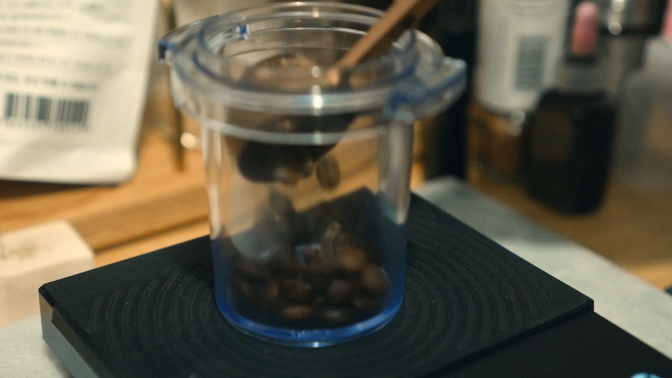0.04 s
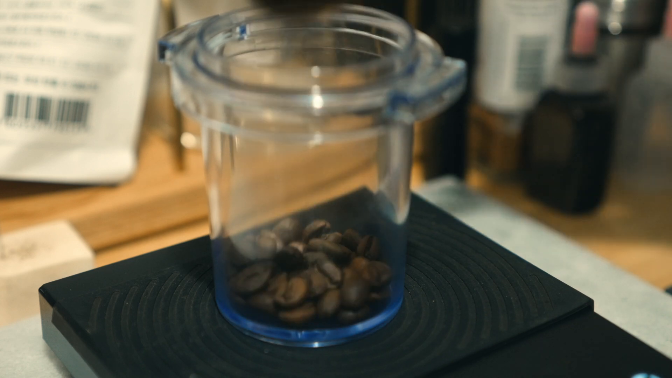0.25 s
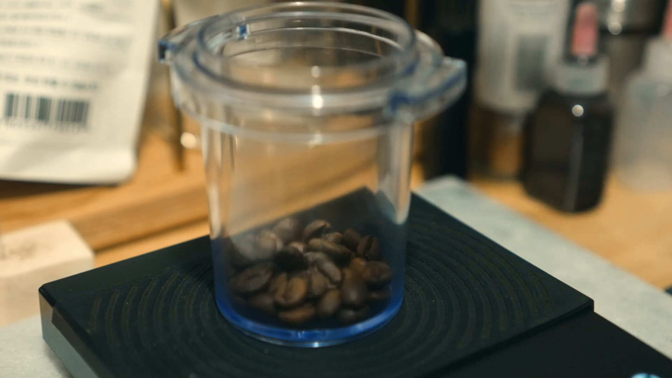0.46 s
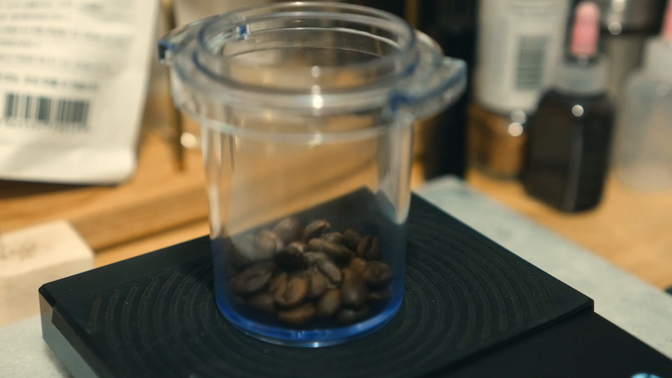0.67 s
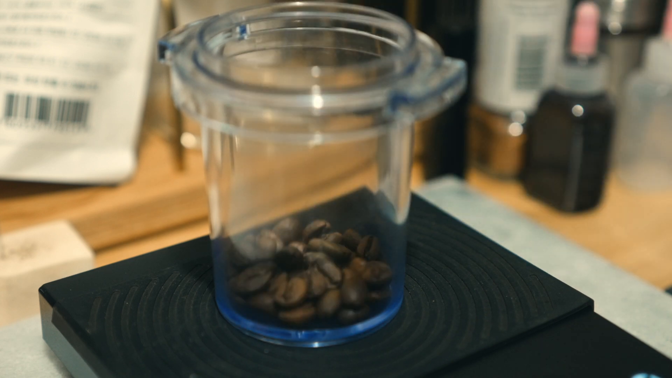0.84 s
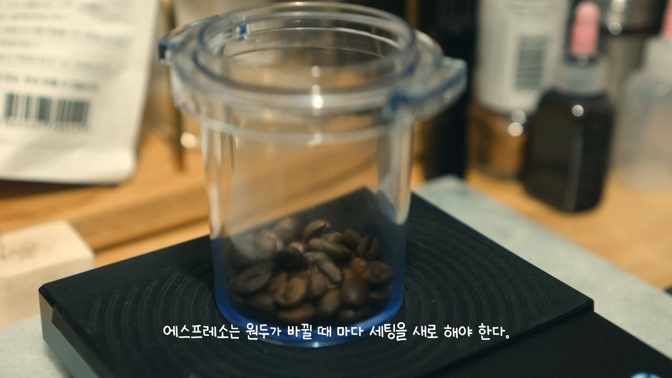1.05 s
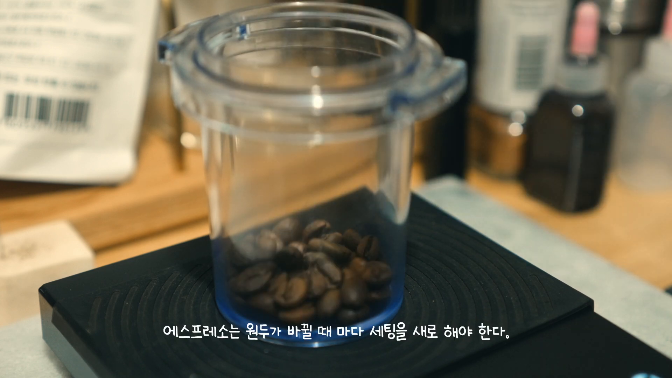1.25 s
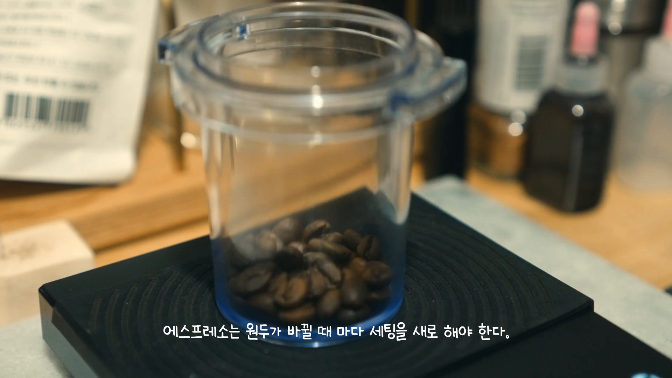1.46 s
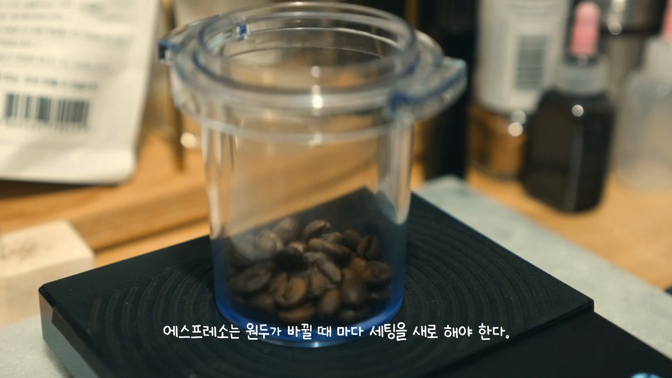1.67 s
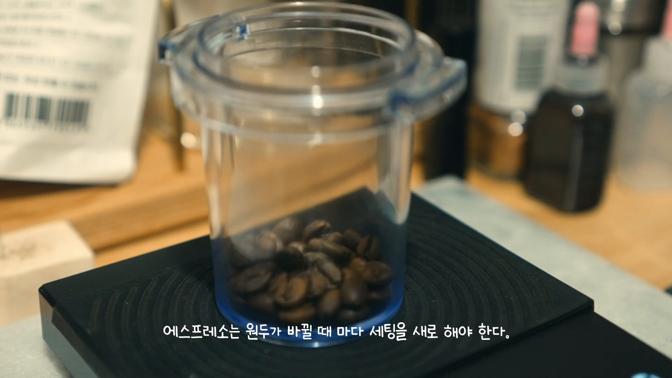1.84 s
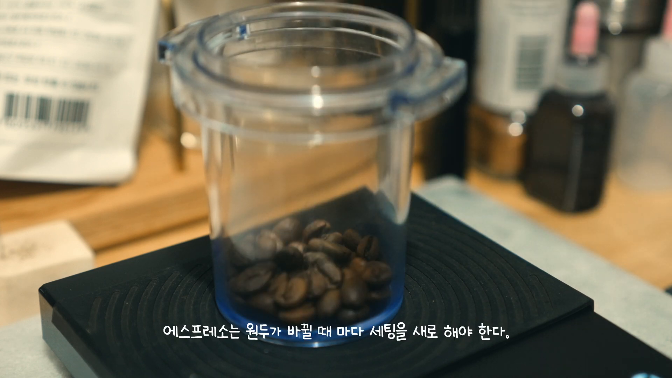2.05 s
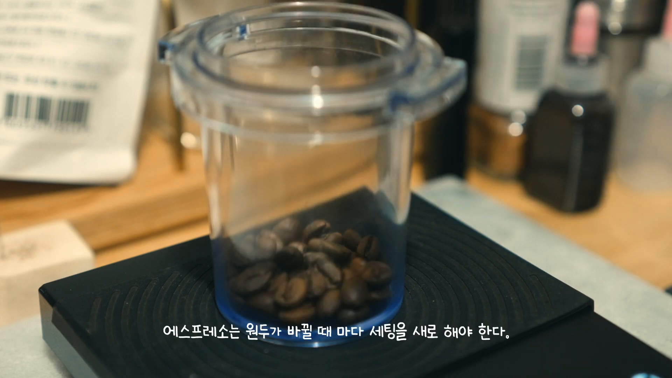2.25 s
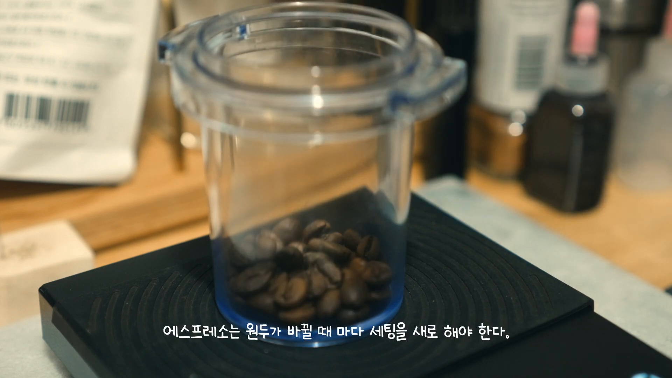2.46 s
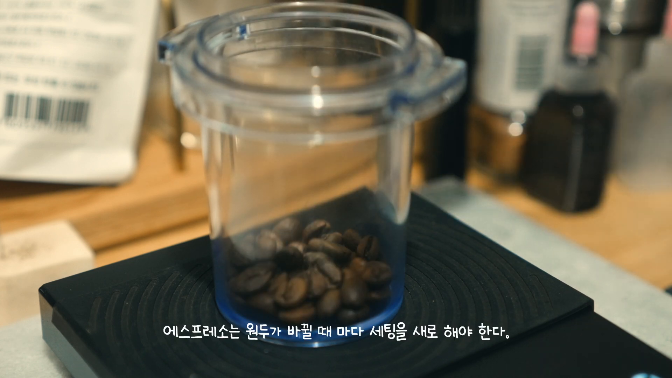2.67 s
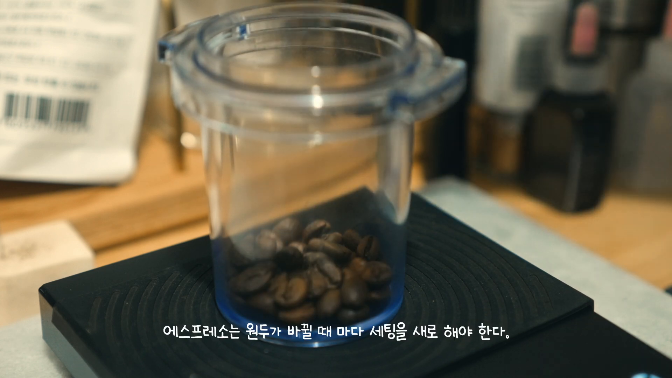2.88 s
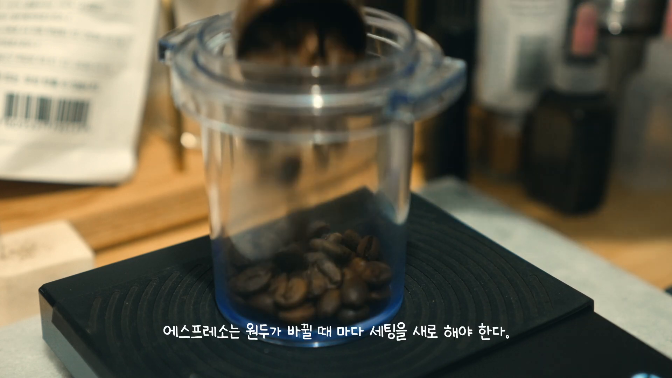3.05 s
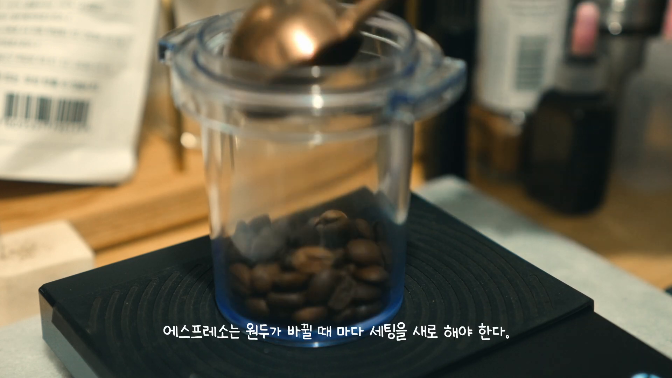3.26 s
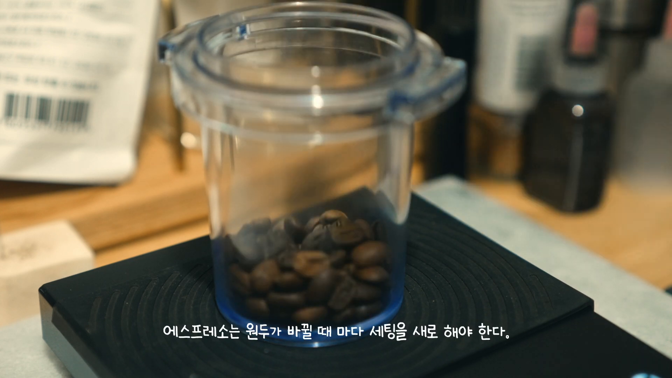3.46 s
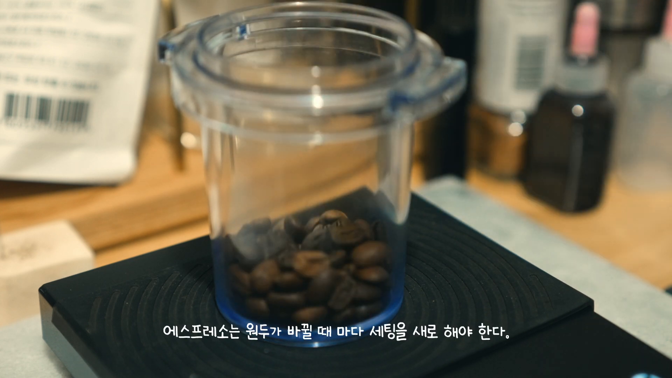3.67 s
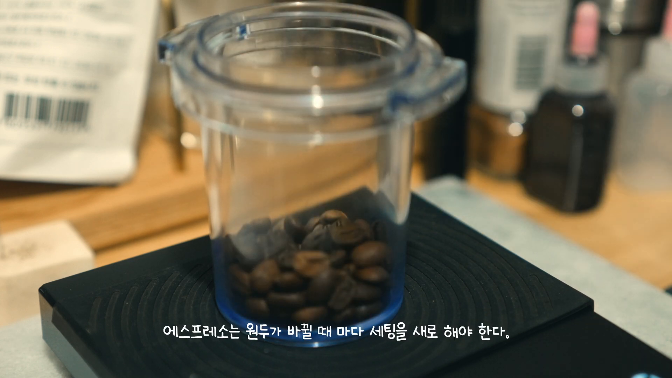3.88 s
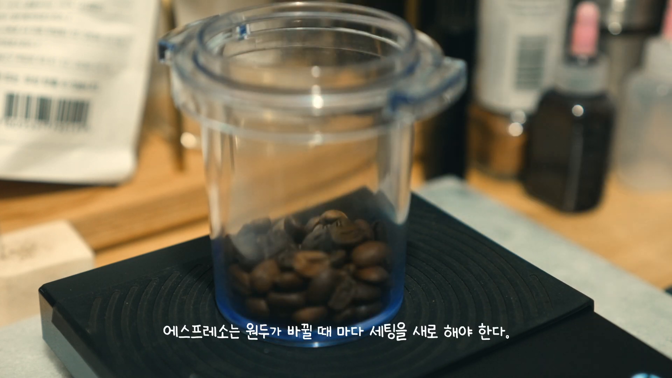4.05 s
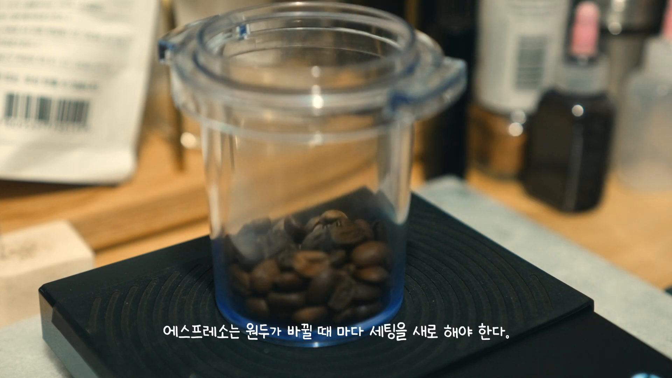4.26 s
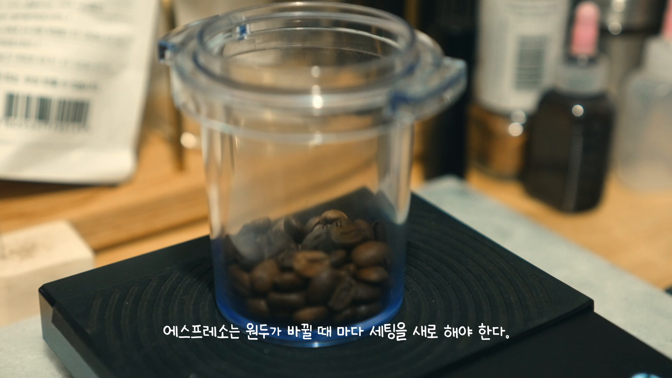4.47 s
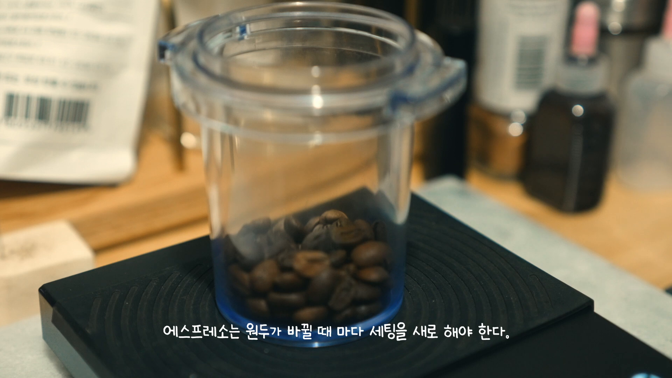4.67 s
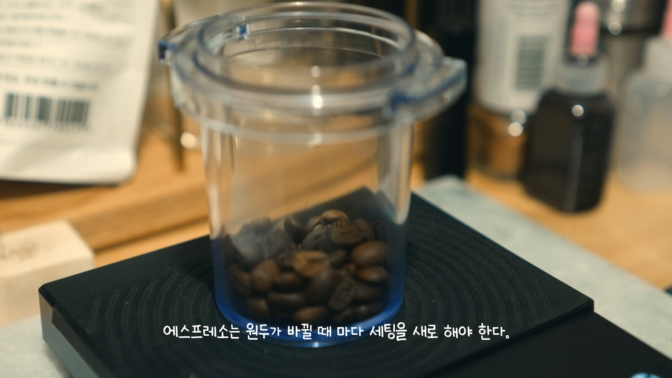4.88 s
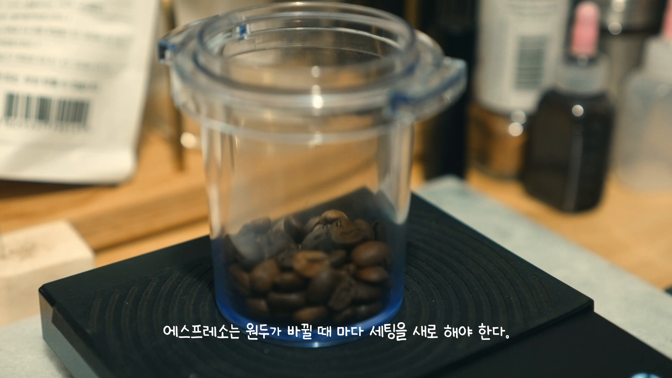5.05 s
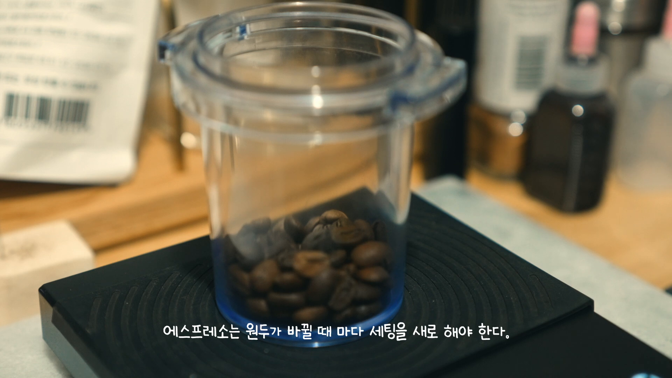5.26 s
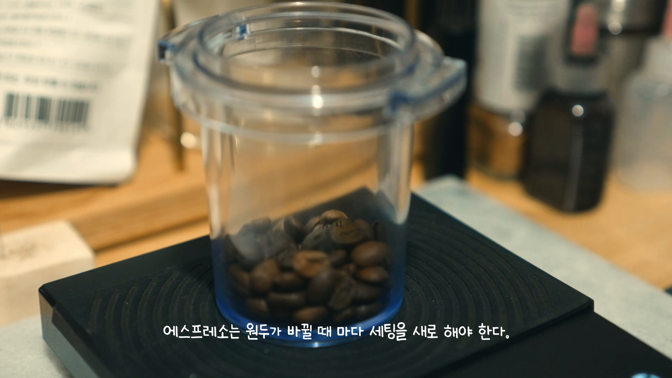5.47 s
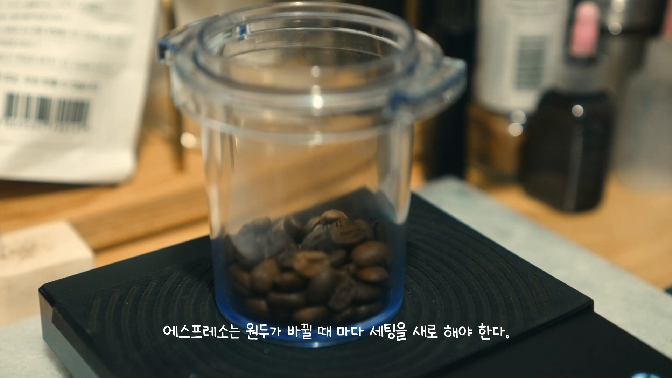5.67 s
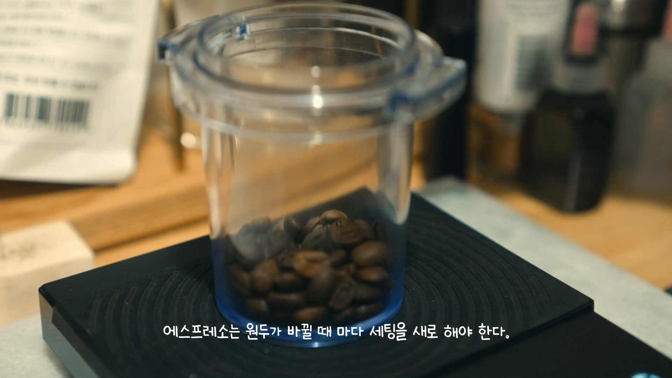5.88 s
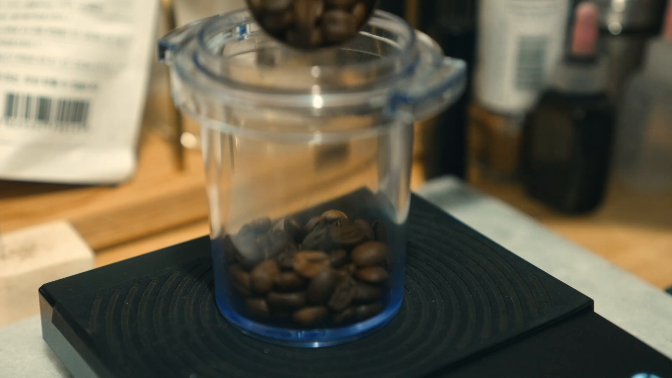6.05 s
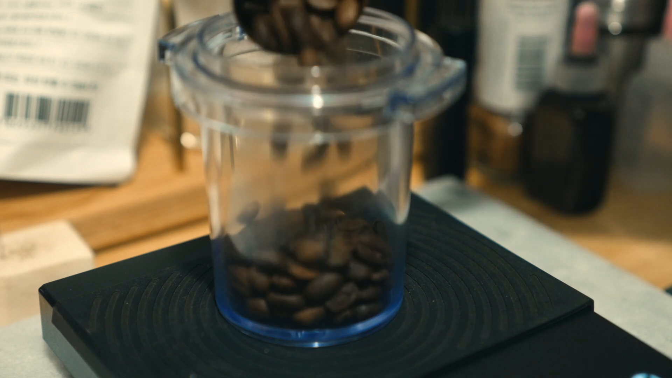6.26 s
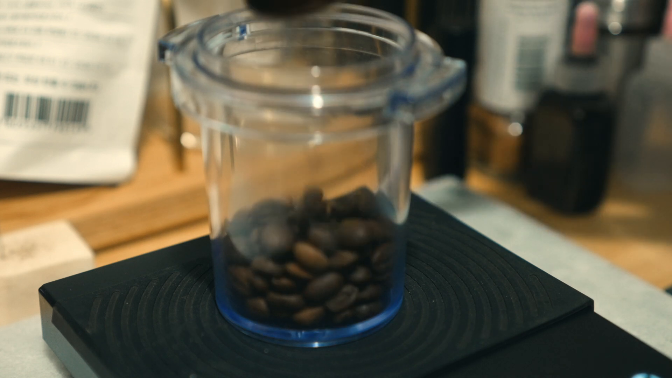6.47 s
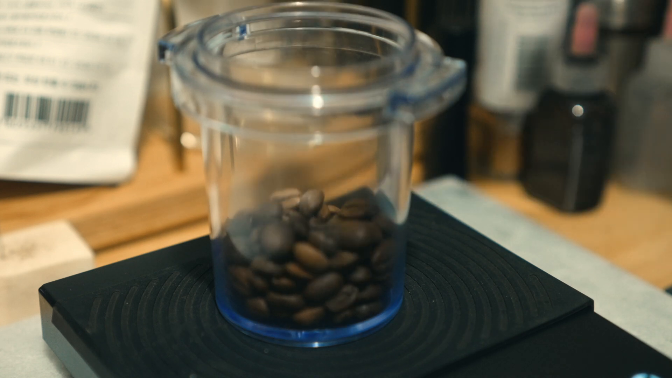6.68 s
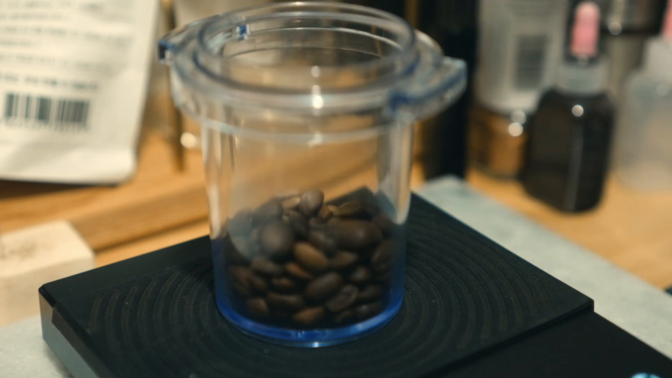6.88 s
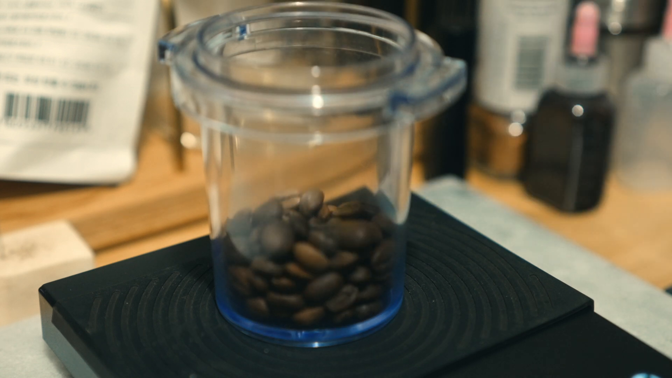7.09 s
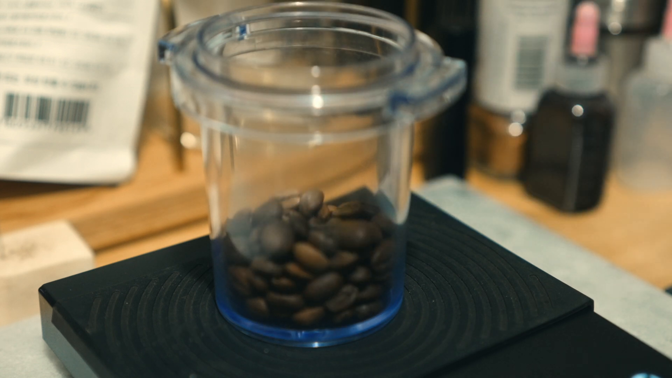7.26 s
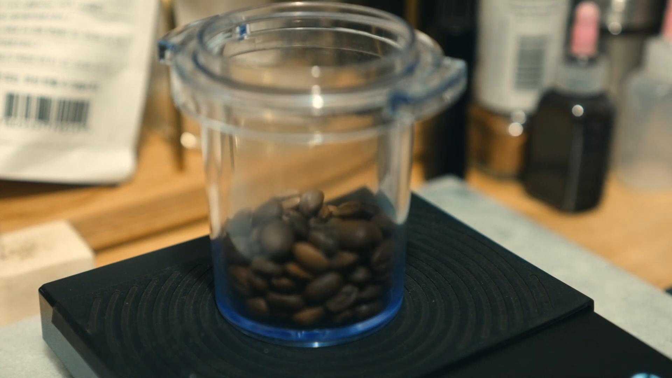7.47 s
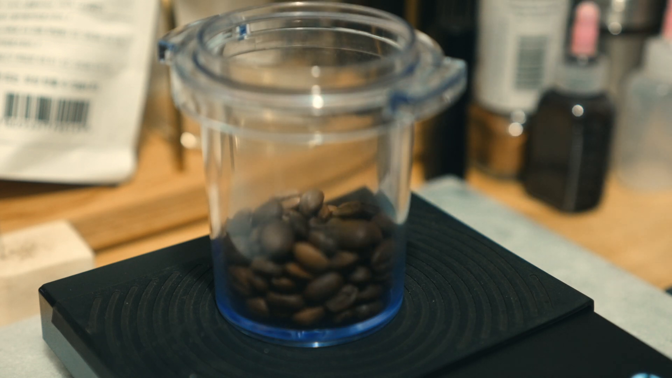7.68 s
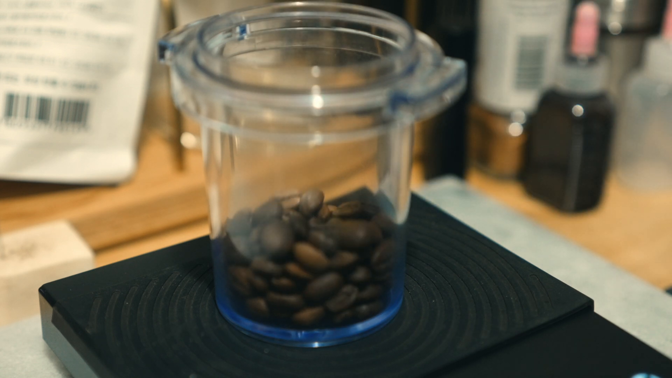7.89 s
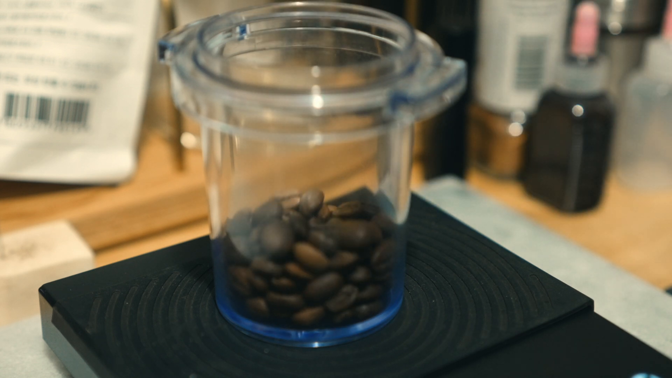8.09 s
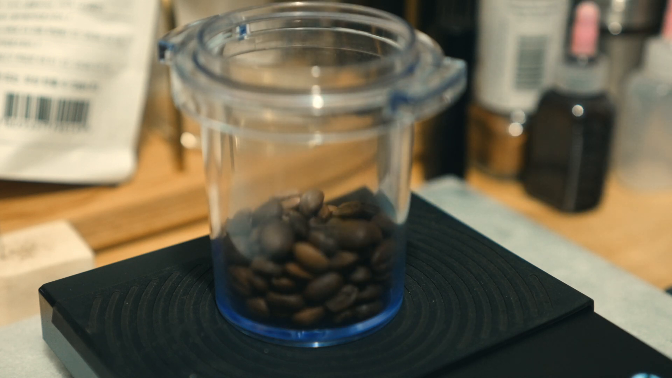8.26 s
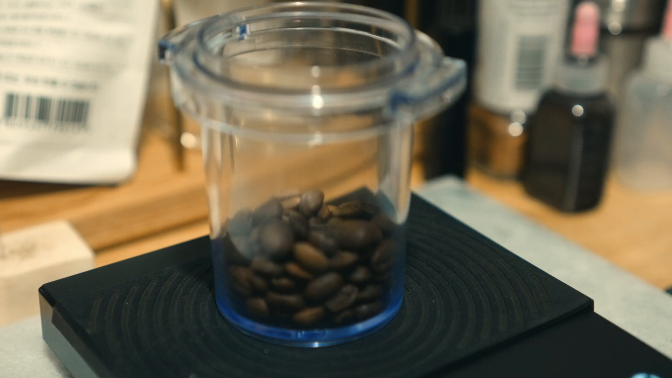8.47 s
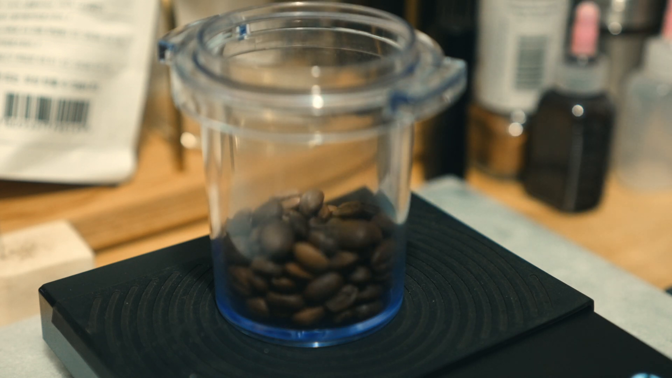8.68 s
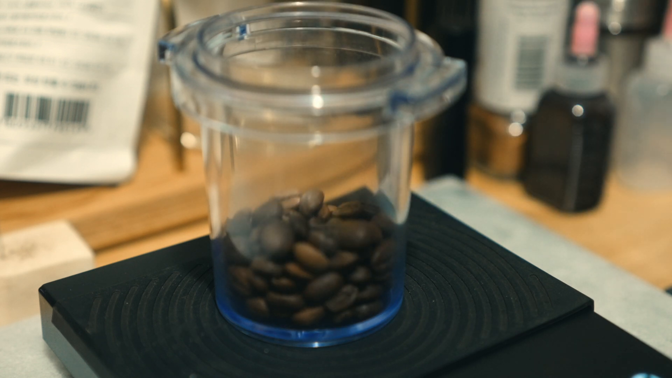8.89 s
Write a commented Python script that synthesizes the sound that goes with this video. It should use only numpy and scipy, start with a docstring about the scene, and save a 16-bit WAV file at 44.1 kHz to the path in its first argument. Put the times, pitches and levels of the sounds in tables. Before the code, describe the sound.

Three short pours of coffee beans hit a plastic cup, each a loud, crisp burst of hard clicks stopping quickly. Between them come softer, hollower jar scoops, a sharp spoon tap and tiny metallic ticks of beans settling in the spoon. A hard counter knock follows the last pour. Close microphone, small dry room with short echoes and low steady noise.

```python
"""In a quiet kitchen, close to one microphone, roasted beans are scooped from a jar with a metal spoon
and poured three times into a hard plastic cup. Each bean is a click that rings whatever it strikes.
Spoon and jar also knock on the wooden counter. Faint echoes and a steady hush lie around it all,
and the loudest clatter is limited."""
import sys
import numpy as np
from scipy import signal
from scipy.fft import rfft, irfft
from scipy.io import wavfile
from scipy.ndimage import uniform_filter1d, minimum_filter1d

SR = 44100
rng = np.random.default_rng(int(sys.argv[2]) if len(sys.argv) > 2 else 0)


def waveform_to_disk(signal):
    """Save audio, clipped to [-1, 1], as 16-bit WAV at the path in sys.argv[1]."""
    frames = np.transpose(np.atleast_2d(signal))
    scaled = np.clip(frames, -1, 1) * 32767
    samples = np.round(scaled).astype(np.int16)
    wavfile.write(sys.argv[1], SR, samples)


def invert_db(level):
    """Linear amplitude ratio for a level in decibels (20 dB per decade), elementwise."""
    return 10 ** (np.asarray(level, dtype=float) / 20)


N = 393813  # length in samples

# Handfuls of small clicks in the cup, the jar, the tilted spoon and on the counter.
# Each row: start in seconds, swell in seconds (1 ms at least), hold in seconds,
# bright rattle at the top of the swell in dB, hollow body in dB above the rattle.
POURS = [(0.0, .001, 0.13, -8.5, -30.5), (2.94, .005, .085, -41.5, 5.5), (3.058, .002, .13, -11, -27),
         (6.072, .02, .022, -19.5, -18), (6.146, .002, .345, -14.5, -20)]
SCOOPS = [(0.9, .002, .2, -25.5, -12), (1.09, 0.029, .065, -20, -3), (1.235, 0.0081, .15, -23, -4.5),
          (1.37, 0.05, .06, -14.5, -18.5), (1.53, 0.033, .25, -22.5, -16), (1.85, .003, .11, -25, -16),
          (2.04, 0.0043, 0.034, -51.5, 5.5), (4.141, .002, .11, -27, -4), (4.23, .045, .05, -21, -4),
          (4.35, .13, .13, -21, -15), (4.62, 0.023, .09, -20, -16.5), (4.77, .03, .008, -23, -15),
          (4.899, .001, 0.0037, -20.5, -15.5), (7.843, 0.0018, .1, -29, -10.5),
          (7.93, 0.015, .012, -22.5, -10), (7.975, 0.012, 0.041, -14.5, -21),
          (8.06, .015, .075, -25.5, -21), (8.17, 0.017, .05, -27.5, -32), (8.235, .03, 0.014, -20.5, -24),
          (8.355, 0.0033, 0.005, -36, -9.5), (8.487, 0.0032, .02, -48.5, -3),
          (8.735, 0.0092, .05, -43.5, -21)]
TILTS = [(2.94, .01, 0.11, -33.5, -20.5), (5.96, 0.024, .085, -42, -15.5)]
SKIDS = [(7.13, 0.0009, .006, -13.5, -6.5), (7.235, .03, 0.024, -25, -3), (7.345, 0.0055, 0.013, -48, -16)]

# The loudest single blows, and loose beans rolling in the lifted spoon.
# Each row: time in seconds, peak of the bright part in dB before limiting.
CUP_HITS = [(0.0404, -0.5), (0.0588, -1.5), (0.1261, -1), (0.1472, -2), (0.1624, -5), (0.1814, -12),
            (0.1989, -12), (0.2157, -16), (0.2389, -18), (3.0599, -1), (3.0774, 2.5), (3.0994, -0.5),
            (3.1185, -1), (3.1424, 1.5), (3.1652, -0.5), (3.1777, -0.5), (3.2236, -1), (3.2804, -10),
            (3.3025, -17.5), (3.3717, -36), (6.0714, -1), (6.0886, 0.5), (6.0995, 2.5), (6.1474, 3.5),
            (6.1689, 0.5), (6.1823, 1.5), (6.2102, -2.5), (6.2278, 4.5), (6.2544, 3.5), (6.2831, 0),
            (6.3026, 1), (6.332, 4), (6.3889, 1.5), (6.4278, 2.5), (6.4405, 0.5), (6.4686, 1.5),
            (6.4916, 2), (6.5571, -6.5)]
JAR_HITS = [(0.9218, -11.5), (0.9974, -14), (1.1138, -4), (1.2436, -6.5), (1.4057, -1.5), (1.4636, 2),
            (1.5594, -10), (1.5858, -11.5), (1.6134, -8.5), (1.6472, -10.5), (1.6734, -9.5), (1.713, -7),
            (1.7548, -8), (1.7699, -2), (1.7797, -3), (1.8079, -5.5), (1.8522, -9.5), (1.8787, -3.5),
            (1.8991, -7.5), (1.9365, -9), (1.9614, -7.5), (2.0068, -21.5), (2.0517, -27.5), (2.0792, -34),
            (4.2765, -6.5), (4.2974, -7), (4.3154, -4), (4.4199, -13.5), (4.4807, -9), (4.5047, -7),
            (4.5321, -6.5), (4.6006, -8.5), (4.6349, -8.5), (4.7069, -6), (4.8015, -3), (4.8394, -15.5),
            (5.043, -35), (7.8433, -16), (7.9473, -5), (8.0726, -10.5), (8.091, -6.5), (8.104, -10),
            (8.1249, -10), (8.1698, -18), (8.1885, -14.5), (8.242, -7.5), (8.265, -6), (8.3355, -17),
            (8.3608, -16), (8.4348, -35.5), (8.4884, -32), (8.4996, -30.5)]
SPOON_TICKS = [(2.474, -33), (2.5623, -40), (2.8326, -39.5), (2.8745, -35), (2.8853, -33), (3.0082, -14),
               (3.038, -13.5), (5.1095, -26), (5.2349, -21.5), (5.2979, -31), (5.3267, -27), (5.3805, -34),
               (5.9694, -22), (5.9811, -23.5), (5.9957, -19.5), (6.0146, -15), (6.0444, -17.5),
               (6.0587, -16), (8.6139, -33.5), (8.7081, -42.5), (8.7429, -28.5), (8.7676, -29.5),
               (8.7901, -26)]

# The spoon taps the cup's rim (one row only), the spoon taps the jar, and knocks on the counter.
# Each row: time in seconds, peak of the bright part in dB before limiting,
# hollow body in dB above the rattle.
RIM_TAP = (2.9282, 0, 4)
JAR_TAPS = [(0.9015, -8, -6), (4.1425, -23.5, -3.5), (4.8993, 1, -16), (8.3731, -17, -1.5)]
COUNTER_KNOCKS = [(4.901, -19, 0), (7.1307, 3, -7), (7.262, -25, 13.5), (7.2731, -14.5, 0.5),
                  (7.2925, -23, 12), (7.3547, -17.5, -11.5)]

# The tones each thing rings with; cup() changes some of the cup's as it fills.
# Each row: pitch in Hz, width in Hz, relative strength in dB.
CUP_MODES = [(996, 70, -14), (1822, 60, -17), (3168, 55, -13), (3688, 45, -3), (4258, 45, -7),
             (5015, 70, -6), (5340, 70, -6), (5880, 50, -4), (6710, 65, 0), (7090, 70, -1), (7370, 90, -2),
             (7615, 110, -2), (8230, 90, -8), (8720, 110, -9), (9800, 60, -15), (11000, 250, -18)]
JAR_MODES = [(199, 16, -19.5), (551, 51, -11.5), (835, 64, -11.5), (1291, 87, -13), (1616, 60, -9.5),
             (2380, 82, -10.5), (3030, 17, -7), (3840, 30, -4.5), (4750, 84, -5.5), (4890, 44, -4),
             (6880, 690, -4.5), (7430, 250, 0), (8100, 65, -1.5), (9190, 110, -10), (11200, 47, -21)]
SPOON_MODES = [(4130, 89, -12), (5370, 55, -3), (6720, 65, -12), (6990, 50, -9), (7450, 42, 0),
               (9330, 45, -9), (12000, 120, -19)]
COUNTER_MODES = [(217, 94, -3.5), (390, 210, 2), (603, 57, 2), (3090, 87, -6), (3860, 450, -4.5),
                 (4900, 120, -6), (7060, 110, 0), (7700, 360, -8)]

# Colour of the dry crack heard between those tones.
# Each row: frequency in Hz, relative strength in dB per Hz.
CUP_CRACK = [(300, -53), (650, -26), (950, -17.5), (1400, -34.5), (2500, -16.5), (3300, -6.5), (5000, -6),
             (7300, 1), (9300, -11.5), (13000, -8.5), (16000, -18)]
JAR_CRACK = [(100, -32), (210, -19), (340, -40), (535, -5), (1950, -9.5), (2370, -4), (3320, -2.5),
             (7290, 3), (8830, -3), (13000, -1.5), (15600, -6.5), (16300, -21.5)]
SPOON_CRACK = [(880, -36), (2000, -17.5), (4600, -5), (7500, -1), (10300, -17), (14100, -17),
               (16000, -21.5)]
COUNTER_CRACK = [(35, -52), (60, -34), (103, -21), (207, -8), (469, -12.5), (700, -6), (1110, -28.5),
                 (3120, -20), (5330, -12.5), (6900, -1.5), (16000, -26)]

# How the cup's ring changes as it fills and landing beans damp its floor and reach its wall.
# Each row: time in seconds, pitch factor of its air, change of wall ring in dB, of floor ring in dB.
CUP_FILL = [(.2, .88, -4, 9), (2.93, .93, 3, 6), (3.1, .89, -2, -5), (6.3, 1.01, 1, -6)]

# Colour of the steady noise. Each row: frequency in Hz, relative strength in dB per Hz.
HUSH_COLOUR = [(12, -63), (20, -28.5), (32, -24), (49, -6.5), (108, -1.5), (437, -15.5), (547, -12.5),
               (724, -17), (810, -9.5), (1040, -16.5), (1590, -7), (3200, -12.5), (6100, -12.5),
               (15000, -20), (16300, -25)]

# How long the kitchen echoes. Each row: frequency in Hz, time to fall 60 dB in seconds.
KITCHEN_DECAY = [(250, .25), (1000, 0.31), (3000, 0.16), (8000, 0.16), (11000, 0.22), (15000, 0.16)]

# How the small clicks come: clumps a second, spread of their sizes in dB, steady slide under them.
POURING, SCOOPING = (360, 1.8, .85), (260, 2.1, .9)
TILTING, SKIDDING = (150, 1.5, .9), (300, 1., 1.5)

# How a handful dies, all in dB a second: sag while it holds, later fall of the rattle, fall of the body.
POUR_END, SCOOP_END = (21, 260, 260), (17, 300, 140)
TILT_END, SKID_END = (5, 600, 600), (40, 300, 256)

SPLIT_HZ = 2200  # bright sound lies above this, hollow sound below
SILENT_DB = -75  # the rattle ends here
SWELL_DB = 12  # the rattle starts this far below its top


def evened(x):
    """Scales a sound to an average strength (rms) of 1."""
    return x / np.sqrt(np.mean(x ** 2) + 1e-30)


def read(points, at):
    """Reads values between (Hz, value) points, with frequency on a log scale."""
    hz, value = np.transpose(points)
    return np.interp(np.log(at + 1), np.log(hz + 1), value)


def hush():
    """Steady room and microphone noise: coloured random noise whose level drifts a little."""
    hz = np.fft.rfftfreq(N, 1 / SR)
    spectrum = rfft(rng.standard_normal(N)) * invert_db(read(HUSH_COLOUR, hz))
    noise = evened(irfft(spectrum, N))
    drift = evened(uniform_filter1d(rng.standard_normal(N), 12000))
    return invert_db(-58 + 1.2 * drift) * noise  # both in dB


def contacts(length):
    """Tiny chance clicks, about 13 in each millisecond."""
    return rng.standard_normal(length) * (rng.random(length) < .3)


def clump(length, rise_s, chatter_s):
    """How hard things jostle after a landing: a quick rise, then a dying chatter."""
    t = np.arange(length) / SR
    return (1 - np.exp(-t / rise_s)) * np.exp(-t / chatter_s)


def causal(points):
    """A short click of the given colour whose energy comes as early as it can (minimum phase)."""
    hz = np.abs(np.fft.fftfreq(4096, 1 / SR))
    log_gain = np.log(invert_db(np.maximum(read(points, hz), -90)))
    spectrum = np.exp(np.conj(signal.hilbert(log_gain)))
    return np.fft.ifft(spectrum).real[:2048]


def ring(clicks, hz, width):
    """One ringing tone: a two-pole resonance with a gain of about 1 at its centre and none at 0 Hz."""
    r = np.exp(-np.pi * width / SR)
    turn = 2 * np.pi * hz / SR
    return signal.lfilter([1 - r, 0, r - 1], [1, -2 * r * np.cos(turn), r * r], clicks)


def chance(length, step):
    """Random values, each held for a number of samples."""
    return np.repeat(rng.standard_normal(length // step + 1), step)[:length]


def struck(clicks, modes, crack, ring_db, floor_hz, shift_db):
    """Each blow lands elsewhere, so it drives each tone by a new chance amount; gives (bright, hollow)."""
    n = len(clicks)
    out = signal.oaconvolve(clicks, causal(crack))[:n]
    for hz, width, db in modes:
        weight = chance(n, 64)
        favour = chance(n, 3072)  # shifts more slowly, as beans move
        out += ring(clicks * weight * invert_db(db + ring_db + shift_db * favour), hz, width)
    high = signal.butter(4, SPLIT_HZ, "high", fs=SR, output="sos")
    # a small body gives off little sound below floor_hz
    low = signal.butter(3, [floor_hz, SPLIT_HZ], "band", fs=SR, output="sos")
    return evened(signal.sosfilt(high, out)), evened(signal.sosfilt(low, out))


def handful(start, swell, hold, bright_db, hollow_db, sag, fall, body_fall):
    """Levels as a handful swells, holds and dies: rows of time in seconds, rattle in dB, body in dB."""
    top = start + max(swell, .001)
    held_db = bright_db - sag * hold
    tail = (held_db - SILENT_DB) / fall
    body_end_db = min(held_db + hollow_db - body_fall * tail, SILENT_DB + 14.5)
    return [(start, bright_db - SWELL_DB, bright_db + hollow_db - SWELL_DB / 2),
            (top, bright_db, bright_db + hollow_db),
            (top + hold, held_db, held_db + hollow_db),
            (top + hold + tail, SILENT_DB, body_end_db)]


def stream(rows, body, shape, per_s, spread_db, steady):
    """Clumps land at chance moments over a steady slide, at the level of the handful."""
    s, bright_db, hollow_db = np.transpose(rows)
    t = np.arange(s[0], s[-1], 1 / SR)
    size = invert_db(spread_db * np.minimum(rng.exponential(1, len(t)), 3))
    landings = size * (rng.random(len(t)) < per_s / SR)
    jostle = steady + signal.oaconvolve(landings, clump(2048, *shape))[:len(t)]
    bright, hollow = struck(jostle * contacts(len(t)), *body)
    level_db = np.interp(t, s, bright_db)
    soft = signal.lfilter(*signal.butter(2, 8500, fs=SR), bright)
    crisp = np.clip(invert_db(1.5 * (level_db + 23.5)), 0, 1)  # slow beans lose the top of their click
    rattle = invert_db(level_db) * (soft + crisp * (bright - soft))
    mix = rattle + invert_db(np.interp(t, s, hollow_db)) * hollow
    edge_s = np.minimum(t - s[0], s[-1] - t)
    return s[0], mix * np.minimum(edge_s / 0.00092, 1)  # short fades at both ends


def blow(row, body, shape):
    """One blow, then its chatter; a heavy, hollow blow touches longer and is duller."""
    s, peak_db, hollow_db = (*row, -22)[:3]  # body in dB above the rattle, -22 where none is given
    dull_hz = np.clip(5000 * invert_db(-hollow_db), 2500, 20000)
    contact = contacts(4096) * clump(4096, *shape)
    contact[0] = 2.1  # the first touch
    dulled = signal.lfilter(*signal.butter(2, dull_hz, fs=SR), contact)
    bright, hollow = struck(dulled, *body)
    mix = (bright + invert_db(hollow_db) * hollow) / np.abs(bright).max()
    fade = np.cos(np.linspace(0, np.pi / 2, 4096))
    return s, invert_db(peak_db) * mix * fade


def add(mix, s, sound):
    """Mixes a sound in at s seconds."""
    part = mix[round(max(s, 0) * SR):][:len(sound)]
    part += sound[:len(part)]


def clatter(handfuls, end, hits, body_at, shape, manner):
    """Streams of small clicks and single blows, all ringing one object."""
    mix = np.zeros(N)
    for row in handfuls:
        add(mix, *stream(handful(*row, *end), body_at(row[0]), shape, *manner))
    for row in hits:
        add(mix, *blow(row, body_at(row[0]), shape))
    return mix


# A body is: tones, crack, boost of the tones in dB, lowest hollow sound in Hz, wander of the tones in dB.
# A shape is: rise of the jostling in seconds, its chatter in seconds.
def cup(s):
    """The cup at time s: its first tone is its air, the second its wall, the fourth its floor."""
    when, *change = np.transpose(CUP_FILL)
    pitch, wall_db, floor_db = (np.interp(s, when, c) for c in change)
    modes = np.array(CUP_MODES, float)
    modes[0, 0] *= pitch
    modes[[1, 3], 2] += wall_db, floor_db
    return modes, CUP_CRACK, 10., 550, 1.5


def pours():
    """Beans falling into the plastic cup ring its air, wall and floor; the spoon taps its rim."""
    return clatter(POURS, POUR_END, CUP_HITS + [RIM_TAP], cup, (.0005, .003), POURING)


def kitchen(x):
    """Echoes of the room: sparse taps of random sign, each band dying at its own speed."""
    taps = np.zeros(SR // 2)
    at = np.arange(140, len(taps) - 20, 20)
    taps[at + rng.integers(0, 20, len(at))] = rng.choice([-1., 1.], len(at))
    hz, t, z = signal.stft(taps, SR, nperseg=256)
    decay = invert_db(-60 * t / read(KITCHEN_DECAY, hz)[:, None])
    tail = signal.istft(z * decay, SR, nperseg=256)[1]
    return signal.oaconvolve(x, tail / np.linalg.norm(tail))[:N]


def scoops():
    """Beans stirred in the jar, and the spoon tapping it, ring the jar's tones."""
    jar = (JAR_MODES, JAR_CRACK, 7., 170, 4.)
    return clatter(SCOOPS, SCOOP_END, JAR_HITS + JAR_TAPS, lambda s: jar, (.0006, .003), SCOOPING)


def spoon():
    """Loose beans roll and slide in the lifted metal spoon and ring its thin, high tones."""
    metal = (SPOON_MODES, SPOON_CRACK, 13., 700, 2.5)
    return clatter(TILTS, TILT_END, SPOON_TICKS, lambda s: metal, (.0002, .0012), TILTING)


def counter():
    """Knocks and short skids ring the broad, low and high tones of the wooden counter."""
    wood = (COUNTER_MODES, COUNTER_CRACK, 4., 170, 1.5)
    return clatter(SKIDS, SKID_END, COUNTER_KNOCKS, lambda s: wood, (.0004, .004), SKIDDING)


def scene():
    """Pours, scoops, spoon and counter in the kitchen, over its hush."""
    dry = pours() + scoops() + spoon() + counter()
    return (dry + invert_db(-11.0) * kitchen(dry) + hush())[None]


def band_limit(x):
    """A steep low-pass at the top of the band."""
    return signal.sosfilt(signal.butter(12, 16430, fs=SR, output="sos"), x)


def record(dry):
    """A quick limiter holds the clatter near full scale, and the last tips clip."""
    room = minimum_filter1d(np.minimum(1.2 / (np.abs(dry) + 1e-9), 1), size=89)  # about 2 ms
    held = dry * uniform_filter1d(room, size=45)  # gain smoothed over about 1 ms
    return band_limit(np.clip(held, -1, 1))


dry = scene()
out = record(dry)
waveform_to_disk(out)
```